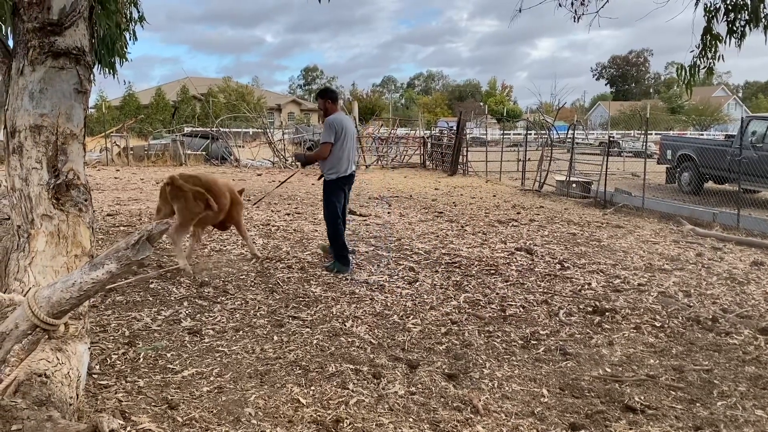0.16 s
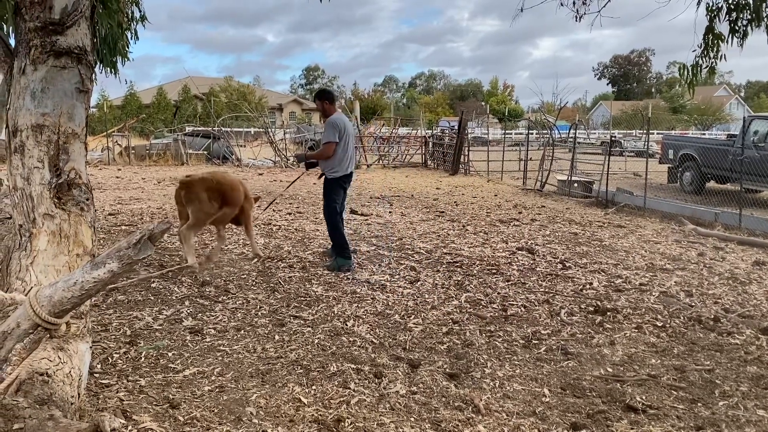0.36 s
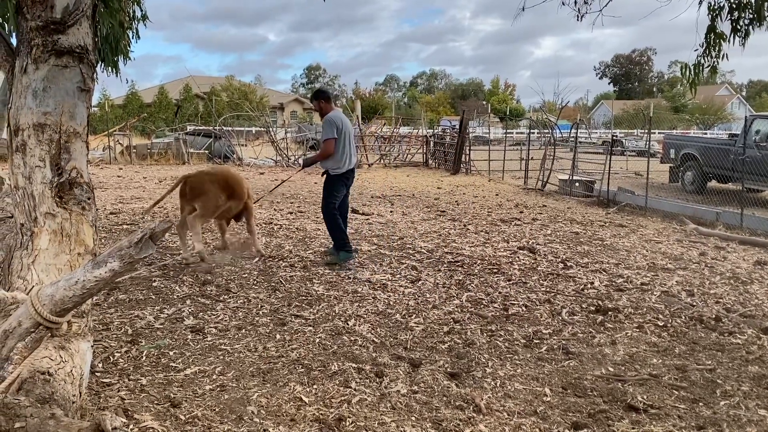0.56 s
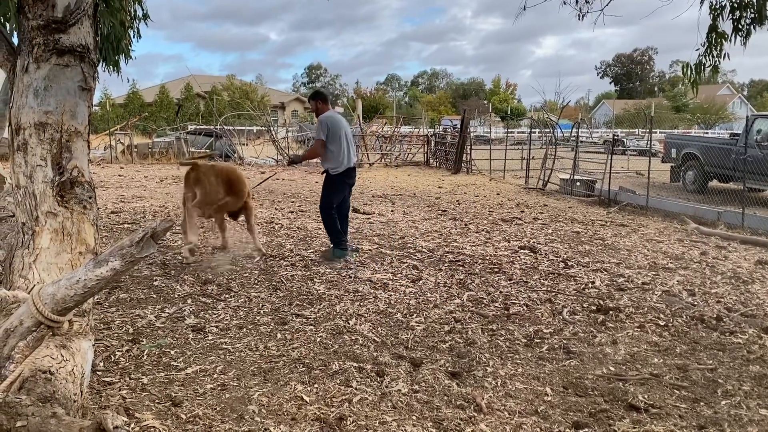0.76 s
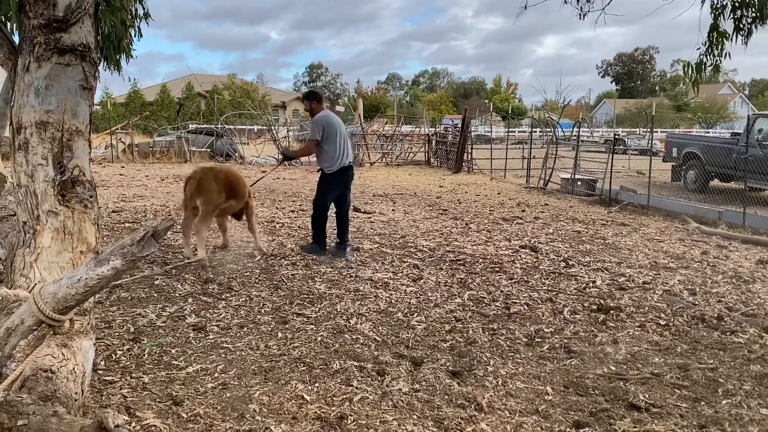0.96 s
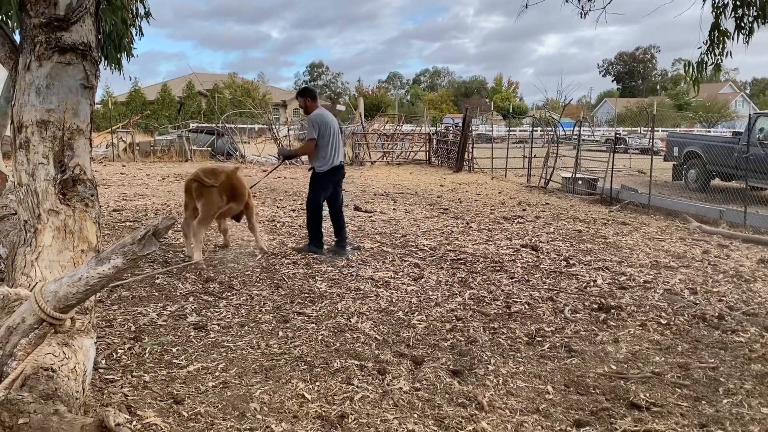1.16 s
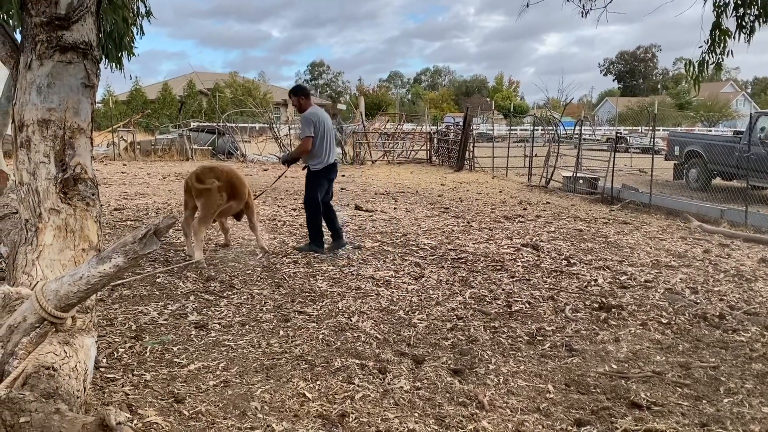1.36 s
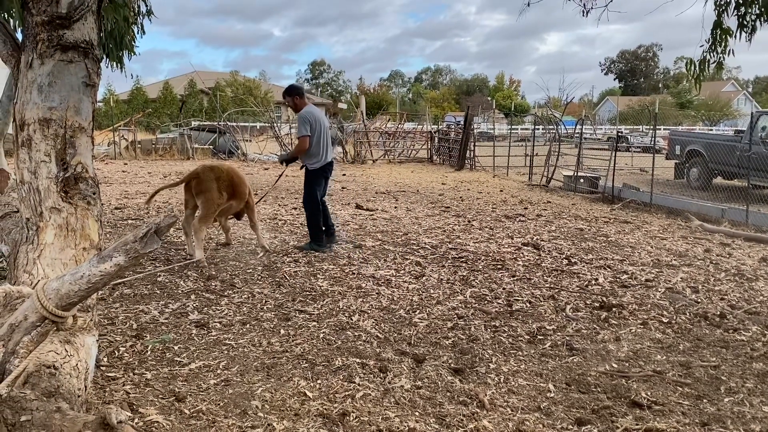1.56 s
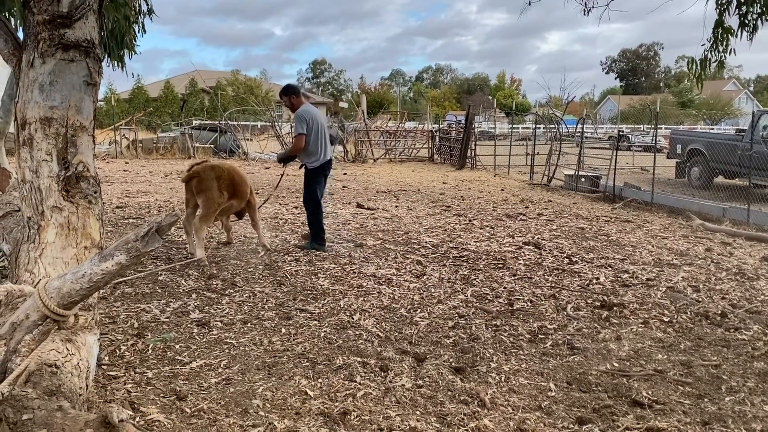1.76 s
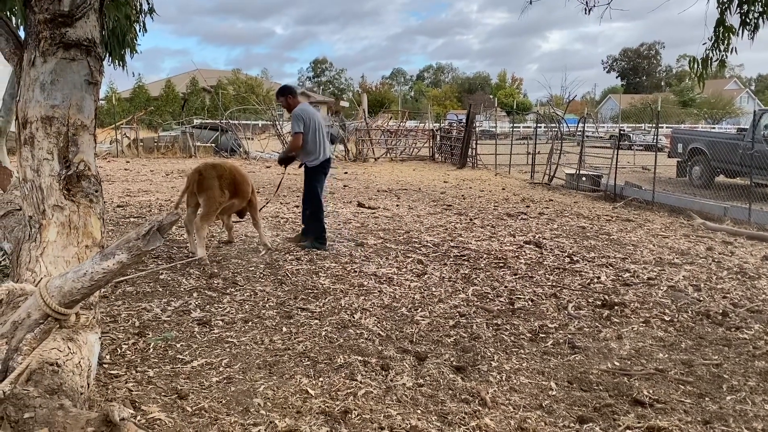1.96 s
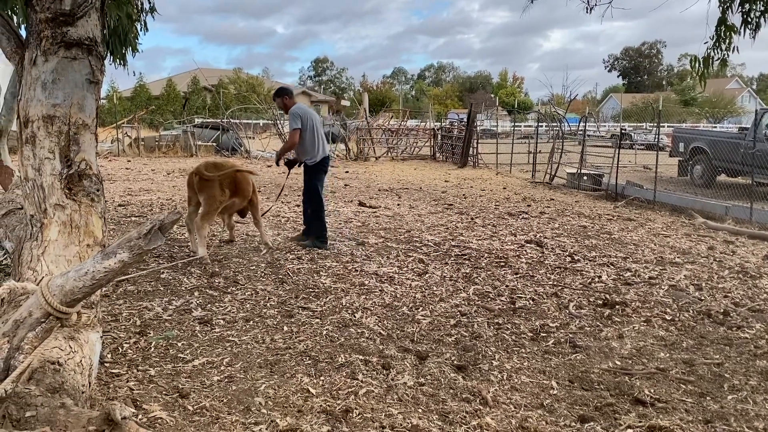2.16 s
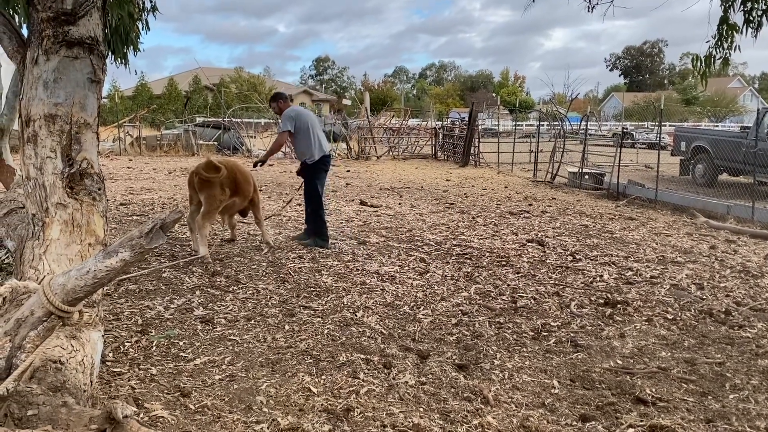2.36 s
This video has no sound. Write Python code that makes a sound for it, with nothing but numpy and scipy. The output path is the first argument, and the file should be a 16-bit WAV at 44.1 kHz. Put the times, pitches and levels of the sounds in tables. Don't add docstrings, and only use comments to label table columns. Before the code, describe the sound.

A young calf bawls once, long and hoarse, in an open dirt pen with faint hoof scuffs.

```python
import sys
import numpy as np
from scipy import signal
from scipy.fft import rfft, irfft, next_fast_len
from scipy.io import wavfile
from scipy.ndimage import uniform_filter1d, map_coordinates

SR = 44100
rng = np.random.default_rng(int(sys.argv[2]) if len(sys.argv) > 2 else 0)


def master(y):
    cut = np.clip(np.atleast_2d(y).T, -1, 1)
    pcm = np.round(cut * 32767)
    wavfile.write(sys.argv[1], SR, pcm.astype(np.int16))


def volts_from_decibels(level):
    exponent = np.asarray(level, float) / 20
    return 10 ** exponent


N = 105840

# start_s, peak_db
TICKS = [
    (0.036, -42),
    (0.0937, -49),
    (0.3564, -48.5),
]


def unit(x):
    return x / np.sqrt(np.mean(x ** 2) + 1e-20)


def along(points, hz):
    f, v = np.transpose(points)
    return np.interp(np.log(hz + 1), np.log(f + 1), v)


def curves(rows):
    s, *columns = np.transpose(rows)
    return [np.interp(np.arange(N) / SR, s, column) for column in columns]


def wobble(rate):
    at = np.arange(0, N + 16, 16)
    knots = rng.standard_normal(2000)
    return np.interp(np.arange(N), at, map_coordinates(knots, [at * rate / SR]))


def bump(s, half):
    return np.exp(-np.clip((np.arange(N) / SR - s) / half, -6, 6) ** 2)


def filtered(x, response):
    m = next_fast_len(N + SR // 2)
    return irfft(rfft(x, m) * response(np.fft.rfftfreq(m, 1 / SR)), m)[..., :N]


def hiss(spectrum, alike):
    a, b = filtered(rng.standard_normal((2, N)), lambda hz: volts_from_decibels(along(spectrum, hz)))
    turn = np.arccos(np.clip(alike, 0, 1)) / 2
    left = np.cos(turn) * a + np.sin(turn) * b
    right = np.cos(turn) * a - np.sin(turn) * b
    return unit(np.array([left, right]))


def distance():
    # freq_hz, level_db
    rumble = [(20, -49.5), (32, -16.5), (45, 5.5), (80, 8.5), (130, 0.5), (220, -8), (400, -37), (800, -45)]
    # freq_hz, level_db
    air = [(200, -0.5), (450, -13.5), (700, -9.5), (1200, -11), (2500, -21), (4000, -32), (8000, -52.5),
           (12000, -75)]
    surge_db = 1.5 * wobble(3.8)
    return volts_from_decibels(-48 + surge_db) * hiss(rumble, alike=0.99) + volts_from_decibels(-50) * hiss(air, alike=0.51)


def litter():
    # centre_s, half_length_s, level_db
    scuffs = [
        (0.035, 0.042, -69),
        (0.104, 0.0036, -56.5),
        (0.223, 0.54, -67),
        (0.371, 0.024, -59),
        (0.467, 0.009, -57),
        (0.52, 0.079, -50),
        (0.704, 0.063, -63),
        (0.83, 0.094, -69),
        (1.017, 0.033, -61.5),
        (1.108, 0.75, -66.5),
    ]
    # freq_hz, level_db
    bark = [(800, -19), (3000, -5.5), (5000, 5), (7000, 6), (11000, 1), (15800, 2)]
    drag = sum(volts_from_decibels(db) * bump(s, half) for s, half, db in scuffs)
    grains = unit(volts_from_decibels(1.3 * wobble(360))) * drag
    t = np.arange(N) / SR
    snap_db, snap_t60_s = 8, .006
    snaps = sum(volts_from_decibels(db + snap_db - 60 * np.clip(t - s, 0, 1) / snap_t60_s) * (t >= s)
                for s, db in TICKS)
    return (grains + snaps) * hiss(bark, alike=0.98)


def throat(hz, opening, turn, tongue, dip_db, hum_db, notch_hz, notch_db, top_db,
           second_db, third_db, upper_db):
    # centre_hz, level_db, tongue_slide_hz, opening_gain_db, head_turn_gain_db
    resonances = [(500, -4, 2, -6.5, -4), (1239, -6.5, 299, 7, 7.5), (1664, -14.5, 43, 25.5, 0),
                  (2310, -9, 53.5, 14.5, 15), (3074, -19.5, 42, 6.5, 8), (3720, -37.5, 50.5, 4.5, -2.5)]
    widths_hz = [144, 343, 448, 680, 670, 585]
    chest = volts_from_decibels(-14.5 + hum_db - dip_db / 3)
    parts = [chest * 1j * hz / (hz + 250) / (1 + (hz / 430) ** 8)]
    lips_db = [0, second_db, third_db, 0, upper_db, upper_db]
    lead_cycles = hz * 0.00033 - 500 * .0005 * (hz / 1000 - 1.2) ** 2
    for k, ((centre, db, slide, grow, face), width) in enumerate(zip(resonances, widths_hz)):
        centre = centre + slide * (tongue - .5)
        gain_db = db + grow * (opening - .5) + face * (turn - 1.0) + lips_db[k]
        if k == 0:
            centre = centre - 73 * (np.maximum(opening, .3) - .5)
            gain = volts_from_decibels(gain_db - dip_db)
            valley = 1
        else:
            blare_db = 0.021 * dip_db
            gain = volts_from_decibels(gain_db + blare_db + top_db * (k > 2)) * np.exp(2j * np.pi * lead_cycles)
            valley = 1 + (866 / hz) ** 8
        edge_hz = 2755 if k < 4 else 4450
        edge = 1 + (hz / edge_hz) ** 12
        ring = 1j * hz * width / (centre * centre - hz * hz + 1j * hz * width)
        parts.append((-1) ** k * gain / edge / valley * ring ** 2)
    nose = volts_from_decibels(-notch_db * np.exp(-((hz - notch_hz) / 124) ** 2))
    power = sum(abs(p) ** 2 for p in parts)
    return nose * np.sqrt(power) * np.exp(1j * np.angle(sum(parts)))


def overtones(phase, pitch, hoarse, pose):
    count, size = 36, 4
    k, t = np.arange(1, count + 1)[:, None], np.arange(N) / SR
    slow = slice(None, None, size ** 3)

    def chance(rate):
        knots = rng.standard_normal((count, 400))
        return map_coordinates(knots, np.broadcast_arrays(k - 1, t[slow] * rate))

    drift_db = 2.2 * np.clip(k / 8, .3, 1) * chance(5.08)
    gains = throat(k * pitch[slow], *pose[:, slow]) * volts_from_decibels(drift_db)
    breath = volts_from_decibels(9.5) * hoarse[slow] * np.clip(k / 8, .3, 1.6) * abs(gains)
    clean = np.sqrt(1 - hoarse[slow]) * gains
    gains = clean + breath * (chance(90) + 1j * chance(90))
    gains = np.array([np.interp(t[::size], t[slow], row) for row in gains])
    pulses = (gains * np.exp(1j * k * phase[::size])).real.sum(axis=0)
    voice = signal.resample_poly(pulses, size, 1)[:N]
    return voice / np.sqrt(abs(uniform_filter1d(voice ** 2, size=5000)) + 1e-9)


def rasp(phase, pitch, turn, rasp_db):
    # freq_hz, level_db
    rasp_tone = [(2500, -44.5), (3900, -31.5), (4700, -48), (5300, -41), (5900, -42), (6500, -38),
                 (7300, -55.5), (11500, -55.5), (14000, -88)]
    count = 36
    high = np.arange(count, 2 * count)[:, None]
    buzz = unit(np.cos(high * phase + high ** 2 / 7).sum(axis=0)) * np.sqrt(count * 2 * pitch / SR)
    gate = unit(np.exp(0.5 * np.cos(phase - 1.2))) * volts_from_decibels(13.5 * turn + rasp_db)
    repeats = .55
    source = np.sqrt(1 - repeats) * rng.standard_normal(N) + np.sqrt(repeats) * buzz
    return filtered(gate * source, lambda hz: volts_from_decibels(along(rasp_tone, hz) - 3.5) * (hz > 2500))


def calf():
    # time_s, pitch_hz, effort_db, mouth_opening_0_1, head_turned_to_ports_0_1,
    # tongue_forward_0_1
    bawl = [(.08, 93.34, -49.5, 0, 0.1, 0.1), (.15, 93, -37.5, 0, 0.7, 0.76),
            (.23, 103.9, -32, 0.58, 0.24, 0.45), (.26, 113.7, -24.5, 0.77, 0.2, 0),
            (.36, 126.2, -19.5, 0.8, 0.21, 0), (.44, 131.6, -20, 0.8, 0.36, 0.03),
            (.57, 131.7, -22.5, 0.37, 0.33, 0.8), (.62, 138.6, -22, 0.33, 0.45, 0.8),
            (.73, 135.8, -20.5, 0.28, 0.4, 0), (.84, 136.8, -18.5, 0.53, 0.73, 0.4),
            (.97, 142.3, -17, 0.67, 0.86, 0.16), (1.2, 139.9, -18.5, 0.57, 0.21, 0.08),
            (1.41, 134.4, -17.5, 0.28, 0.78, 0.53), (1.55, 132.4, -20.5, 0.25, 1, 0.15),
            (2.1, 123.3, -25.5, 0.38, 1, 0.39), (2.19, 116, -26, 0.23, 0.65, .35),
            (2.225, 101.8, -26, 0, 0.58, 0.5), (2.3, 87.2, -53.5, 0, 1, 0.9)]
    # time_s, hoarse_0_1
    hoarseness = [(.08, .6), (.2, .4), (.25, .11), (.45, .1), (.6, .09), (.68, .055), (1.3, .06),
                  (1.4, .035), (2.1, .03), (2.22, .045), (2.28, .3)]
    # time_s, chest_dip_db, pitch_kick_hz, half_length_s
    jolts = [(0.235, 8, -4.5, 0.0081), (0.329, 17, 3, 0.011), (0.415, 3, 4.5, 0.013),
             (0.507, 0.5, 4, 0.017), (0.564, 2.5, -3.5, 0.005), (0.596, 2, 3.5, 0.0048),
             (0.742, 2.5, 2, 0.014), (0.889, 0.5, 0.5, 0.017), (1.044, 1, 0, 0.012), (1.157, 0.5, 1, 0.025),
             (1.377, -0.5, -1.3, 0.016), (1.612, -0.5, 2, 0.0073)]
    # time_s, notch_hz, notch_depth_db, chest_hum_db, upper_throat_db, rasp_db
    nose_moves = [(.08, 680, 18, 10.5, -24, -1), (.2, 640, 23, -0.5, -10, -2),
                  (.29, 680, 15.5, 3.5, -20, 7), (.38, 648, 5.5, -1.5, 2, -5.5),
                  (.47, 680, 8, 1, -2.5, -2.5), (.58, 695, 16, -1.5, 2.5, -2.5),
                  (.68, 694, 17.5, 1.5, 1, 11), (.86, 770, 11, -5.5, -0.5, 0.5),
                  (.97, 667, 4.5, -5.5, -2.5, -11), (1.08, 740, 7, -0.5, 4.5, -3.5),
                  (1.2, 687, 7, -2.5, 6.5, 4), (1.32, 760, 8, -6, 2.5, -2.5),
                  (1.45, 880, 19.5, -1.5, 1, 0.5), (1.6, 1012, 14.5, 0, 1, -0.5),
                  (1.75, 934, -1.5, 3.5, 6, 3.5), (1.9, 930, 4, 3.5, 0, 5.5), (2.02, 900, 9.5, 4, -2, 5),
                  (2.2, 872, 9, 7, -2.5, 5.5)]
    # time_s, second_resonance_db, third_resonance_db, top_two_resonances_db
    lips = [(.1, 5, -2, -2), (.3, -1.5, 0.5, 2), (.44, -2, 4, -7.5), (.6, 0, 0, -6), (.8, -2, 1.5, 0.5),
            (1.1, -1, 3.5, -5), (1.45, 0.5, 3, -0.5), (1.8, 1, 4, -1.5), (2.1, -0.5, -3.5, 3),
            (2.24, 2, -5, 7)]
    # release_s, held_db, build_up_s
    catches = [
        (0.142, 5, 0.014),
        (.253, 4, 0.004),
        (0.343, 1.5, 0.014),
        (.424, 8, 0.0082),
    ]
    pitch, effort_db, opening, turn, tongue = curves(bawl)
    hoarse, = curves(hoarseness)
    notch_hz, notch_db, chest_db, top_db, rasp_db = curves(nose_moves)

    dip_db = sum(db * bump(s, half) for s, db, _, half in jolts)
    pitch = pitch + sum(hz * (bump(s + half, half) - bump(s - half, half)) for s, _, hz, half in jolts)
    jitter = .002 * (wobble(25.32) + 40 * hoarse * wobble(70))
    pitch = pitch * (1 + jitter)
    phase = 2 * np.pi * np.cumsum(pitch) / SR

    hum_db = 30.5 * hoarse + chest_db
    pose = np.array([opening, turn, tongue, dip_db, hum_db, notch_hz, notch_db, top_db, *curves(lips)])
    voice = overtones(phase, pitch, hoarse, pose)
    t, fade_s = np.arange(N) / SR, 0.015
    fade_in = np.clip((t - bawl[0][0]) / fade_s, 0, 1)
    fade_out = np.clip((bawl[-1][0] + 0.033 - t) / fade_s, 0, 1)
    held_db = sum(db * (t < s) * bump(s, rise) for s, db, rise in catches)
    level = volts_from_decibels(effort_db - held_db) * fade_in * fade_out
    return np.array([voice, rasp(phase, pitch, turn, rasp_db)]) * level


def ports(voice):
    # time_s, right_delay_samples, left_over_right_db
    offsets = [(0, 5, 1), (.5, 5.5, -0.5), (.75, 6.5, 1.5), (.95, 7, -0.7), (1.3, 6.5, 0.4), (1.7, 7, 1.4),
               (1.95, 5.5, 1), (2.4, 7.5, 1.1)]
    lag, pan_db = curves(offsets)
    return np.array([map_coordinates(voice, [np.arange(N) + side * lag / 2]) * volts_from_decibels(side * pan_db / 2)
                     for side in (1, -1)])


def yard(x):
    # freq_hz, t60_s
    decay = [(200, .13), (500, .17), (1500, .17), (3000, .16), (8000, .12)]
    hz, t, z = signal.stft(rng.standard_normal((2, SR // 2)), SR, nperseg=256)
    fade = volts_from_decibels(-60 * t / along(decay, hz)[:, None])
    tail = signal.istft(z * fade, SR, nperseg=256)[1]
    tail = tail / np.linalg.norm(tail[0])
    late = np.pad(x, (300, 0))
    return signal.fftconvolve(late[None], tail, axes=1)[:, :N]


def scene():
    bed = distance() + litter()
    voice, hoarse_rasp = calf()
    direct = ports(voice) + hoarse_rasp * volts_from_decibels([[1.5], [-1.5]])
    return bed + direct + volts_from_decibels(-14) * yard(voice + hoarse_rasp)


def low_pass(x):
    return signal.sosfilt(signal.butter(12, 16280, fs=SR, output="sos"), x)


def record(dry):
    # low_hz, high_hz
    flipped_bands = [(8300, 9650), (12650, 14150)]
    # freq_hz, gain_db
    width_db = [(30, -3), (250, -2), (700, 3.5), (1400, -2), (2500, -4.5), (3600, -15.5), (7000, 12.5)]
    shared_hz, limit_hz = 7500, 15830

    def flipped(hz):
        return sum((hz > lo) * (hz < hi) for lo, hi in flipped_bands)

    turned = filtered(dry[0], lambda hz: flipped(hz) * volts_from_decibels(4.5))
    upright = np.clip(2 * sum(bump(s, 0.0094) for s, _ in TICKS), 0, 1)
    polarity = np.array([np.ones(N), 2 * upright - 1])
    plain = filtered(dry[0], lambda hz: (hz > shared_hz) * (hz < limit_hz) * (1 - flipped(hz)))
    treble = plain + turned * polarity
    mid = filtered(dry.mean(axis=0), lambda hz: hz <= shared_hz)
    side = filtered((dry[0] - dry[1]) / 2, lambda hz: (hz <= shared_hz) * volts_from_decibels(along(width_db, hz)))
    return low_pass(np.array([mid + side, mid - side]) + treble)


dry = scene()
out = record(dry)
master(out)
```